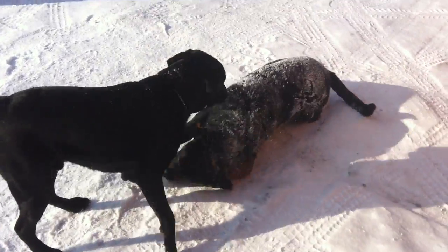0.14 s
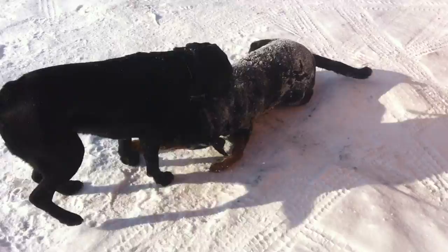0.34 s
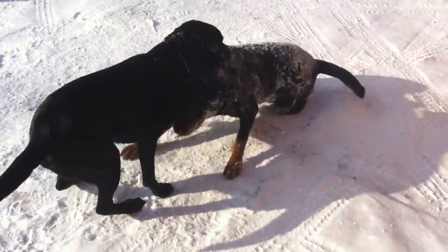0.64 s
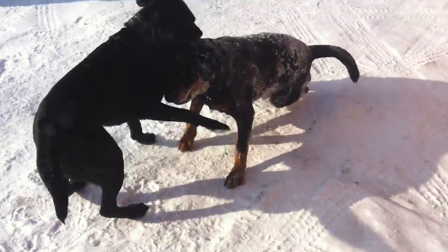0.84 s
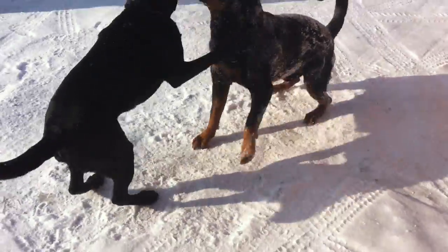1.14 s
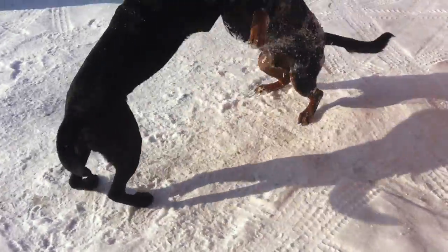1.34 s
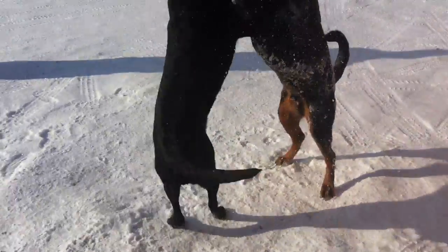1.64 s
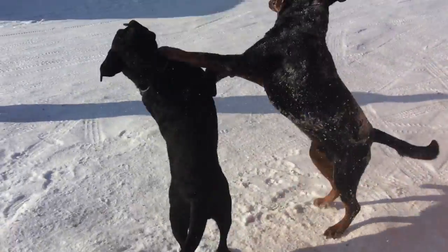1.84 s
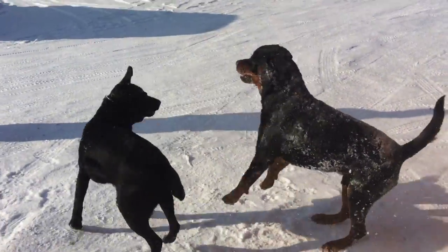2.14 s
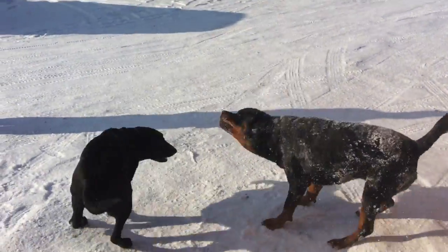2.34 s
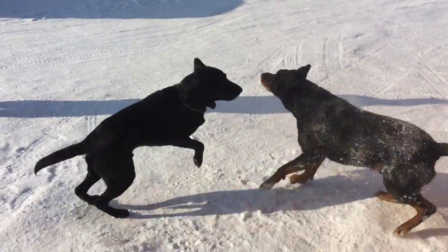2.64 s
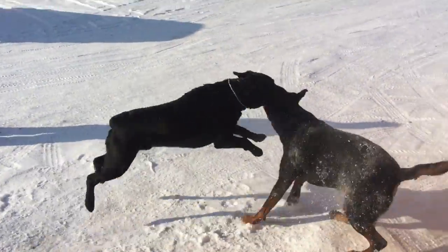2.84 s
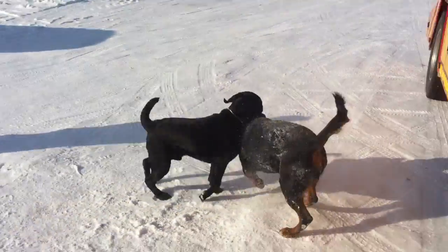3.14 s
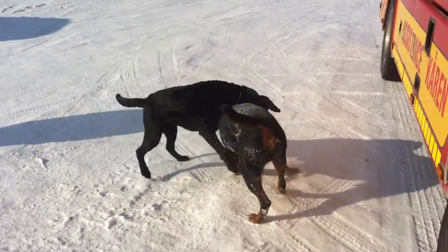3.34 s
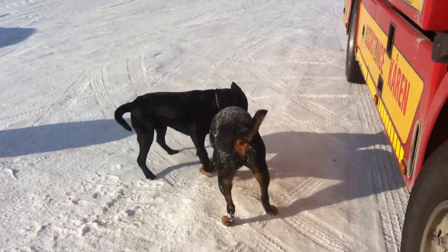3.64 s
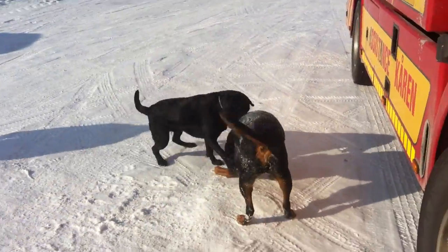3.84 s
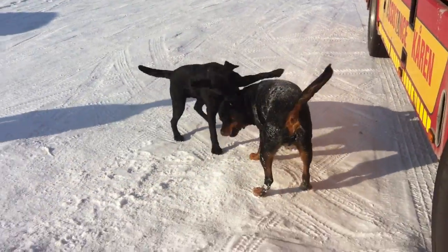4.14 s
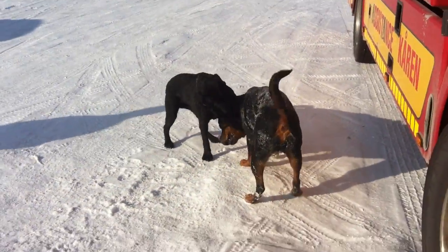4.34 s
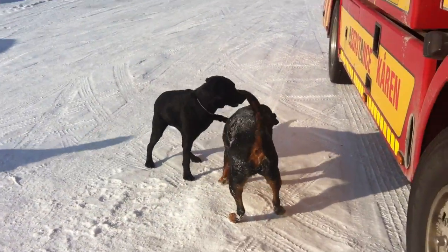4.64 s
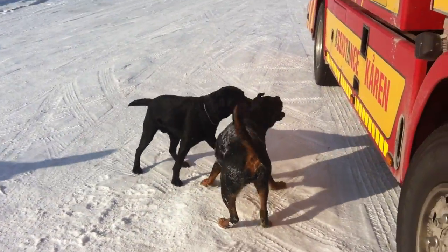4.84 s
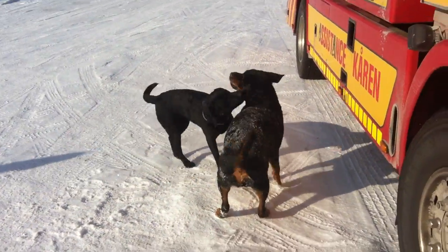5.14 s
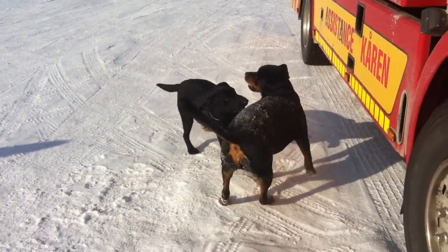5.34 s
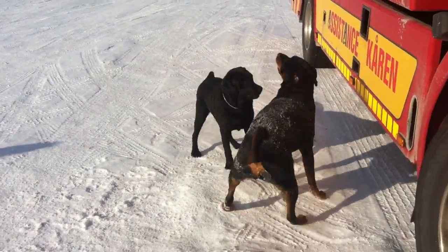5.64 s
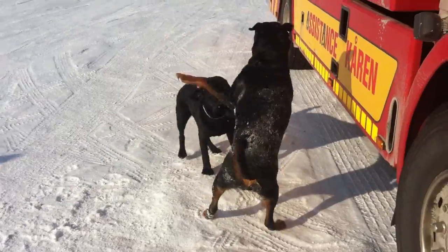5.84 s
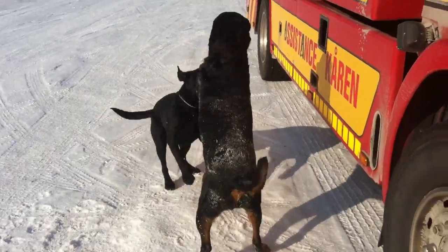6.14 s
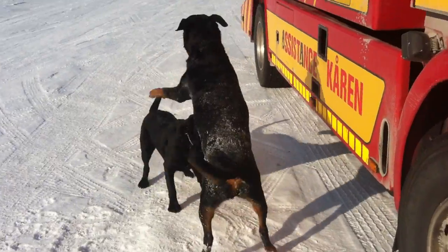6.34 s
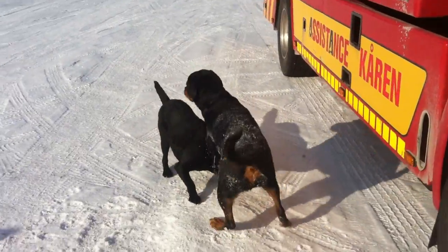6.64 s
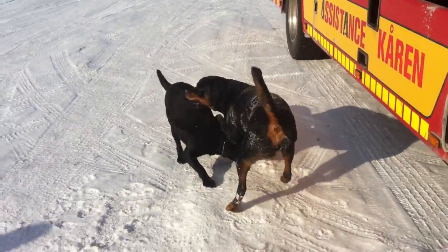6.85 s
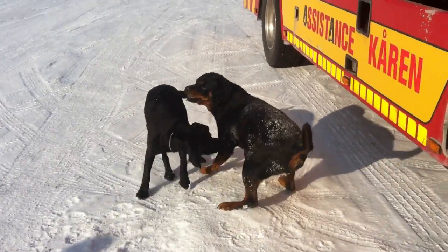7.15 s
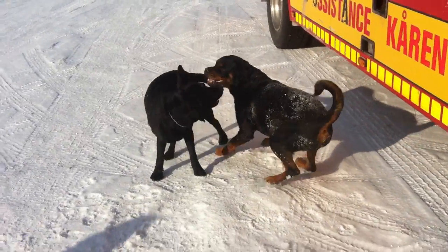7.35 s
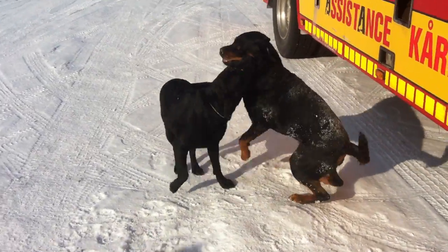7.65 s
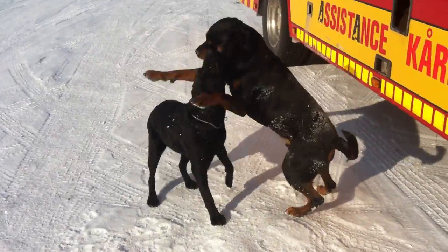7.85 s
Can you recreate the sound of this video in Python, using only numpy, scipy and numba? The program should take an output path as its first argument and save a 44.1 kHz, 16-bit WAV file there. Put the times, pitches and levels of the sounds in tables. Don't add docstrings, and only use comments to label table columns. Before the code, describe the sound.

Rough dog play outdoors: breathy huffs and grunts, snow scuffs, teeth clicks and dull thuds, then strong low wind rumble takes over.

```python
import sys
import numpy as np
from scipy import signal
from scipy.io import wavfile
from scipy.ndimage import uniform_filter1d
from numba import njit

SR = 44100
rng = np.random.default_rng(int(sys.argv[2]) if len(sys.argv) > 2 else 0)


def wav_record(signal):
    frames = np.transpose(np.atleast_2d(signal))
    bounded = np.clip(frames, -1, 1)
    quanta = np.round(bounded * 32767).astype(np.int16)
    wavfile.write(sys.argv[1], SR, quanta)


def makeup_ratio(level_db):
    decades = np.asarray(level_db, float) / 20
    return 10 ** decades


N = 352755
CONTROL = 64


def rms_one(x):
    return x / np.sqrt(np.mean(x ** 2) + 1e-20)


def in_time(rows):
    s, *columns = np.transpose(rows)
    return [np.interp(np.arange(N) / SR, s, c) for c in columns]


def drift(rate_hz):
    r = np.exp(-40 * np.pi * rate_hz / SR)
    white = rng.standard_normal(N // 20 + 4002)
    slow = signal.lfilter([1], [1, -2 * r, r * r], white)[4000:]
    return np.interp(np.arange(N) / 20, np.arange(len(slow)), rms_one(slow))


def band(x, low_hz, high_hz, order=2):
    edges_hz = [low_hz, min(high_hz, .45 * SR)]
    return signal.sosfilt(signal.butter(order, edges_hz, "band", fs=SR, output="sos"), x)


def high_pass(x, order, cut_hz):
    return signal.sosfilt(signal.butter(order, cut_hz, "high", fs=SR, output="sos"), x)


def coloured(source, spectrum, patchy_db, patches_per_s):
    hz, level_db = np.transpose(spectrum)
    edges_hz = 40 * 2 ** np.arange(0, 9, 1 / 3)
    out = 0
    for k, (low_hz, high_hz) in enumerate(zip(edges_hz, edges_hz[1:])):
        centre_db = np.interp(np.log(low_hz * high_hz) / 2, np.log(hz), level_db)
        gain = makeup_ratio(centre_db + patchy_db * drift(patches_per_s))
        out = out + gain * band(source[k % 2], low_hz, high_hz)
    return out


@njit
def resonance(x, hz, width_hz, sr):
    r = np.exp(-np.pi * width_hz / sr)
    out = np.zeros(len(x))
    for i in range(2, len(x)):
        drive = (1 - r * r) / 2 * (x[i] - x[i - 2])
        turn = 2 * r * np.cos(2 * np.pi * hz[i] / sr)
        out[i] = drive + turn * out[i - 1] - r * r * out[i - 2]
    return out


def evened(x, size=900):
    return np.std(x) * rms_one(x / np.sqrt(uniform_filter1d(x ** 2, size=size) + 1e-20))


def add(track, s, sound):
    at = max(round(s * SR), 0)
    track[at:at + len(sound)] += sound[:N - at]


def swells(s, peak_db, rise_s, fall_s, hold_s=0):
    late_s = np.arange(0, N + CONTROL, CONTROL) / SR - np.asarray(s)[:, None]
    past_hold_s = late_s - np.maximum(hold_s, 0)[..., None]
    rising = np.maximum(-late_s, 0) / np.maximum(rise_s, .004)[..., None]
    falling = np.maximum(past_hold_s, 0) / np.maximum(fall_s, .004)[..., None]
    return np.asarray(peak_db)[:, None] - 10 * (rising + falling)


def summed_db(levels_db, rest_db):
    steps = np.arange(levels_db.shape[1])
    power = np.interp(np.arange(N) / CONTROL, steps, np.sum(makeup_ratio(2 * levels_db), axis=0))
    return 10 * np.log10(power + makeup_ratio(2 * rest_db))


# full_s, effort_db, hold_s, throat_hz, mouth_hz
GRUNTS = [(0.047, -56, 0.007, 580, 1060), (0.126, -64, 0.12, 610, 1090), (0.357, -61, 0.1, 590, 1134),
          (1.386, -52, 0.0091, 473, 324), (1.412, -54.5, 0.012, 486, 700), (3.806, -52.5, 0.064, 1050, 786),
          (3.854, -57, 0.15, 740, 500), (4.19, -62.5, 0.068, 735, 425), (4.432, -56.5, 0.074, 933, 720),
          (4.627, -58, 0.063, 970, 705), (4.785, -62.5, 0.074, 784, 940), (5.037, -57.5, 0.095, 700, 990),
          (5.359, -57.5, 0.048, 776, 1175), (5.679, -57, 0.067, 1037, 840), (5.874, -61, 0.029, 1050, 820),
          (6.207, -63, 0.11, 1025, 564), (6.429, -59.5, 0.025, 566, 935), (6.89, -57, 0.12, 875, 1020),
          (7.075, -59, 0.084, 840, 1020), (7.509, -54, 0.097, 770, 1100), (7.686, -60, 0.099, 745, 1000),
          (7.79, -57.5, 0.11, 740, 964)]
# full_s, effort_db, hold_s, throat_hz, mouth_hz
SNORTS = [
    (2.186, -44.5, 0.017, 930, 348),
    (2.222, -36, 0.02, 935, 400),
    (2.26, -42.5, 0.031, 973, 356),
    (2.29, -41.5, 0.06, 872, 450),
]
# full_s, effort_db, hold_s, throat_hz, mouth_hz
HUFFS = [
    (0.71, -48, 0.067, 630, 970),
    (1.29, -54, 0.0065, 517, 756),
    (1.312, -53, 0.036, 490, 1040),
    (1.69, -58, 0.11, 960, 657),
    (2.051, -53.5, 0.062, 930, 740),
    (2.398, -48, 0.031, 632, 1110),
    (3.04, -51.5, 0.083, 660, 1226),
    (3.303, -51, 0.065, 840, 620),
    (6.502, -58.5, 0.075, 704, 410),
]
# full_s, effort_db, hold_s, throat_hz, mouth_hz
PANTS = [
    (1.86, -69.5, 0.22, 1050, 910),
    (2.64, -65.5, 0.059, 720, 1140),
    (2.76, -73, 0.0062, 710, 1080),
    (2.861, -63.5, 0.15, 576, 1000),
    (3.189, -64, 0.081, 1000, 507),
    (3.439, -64.5, 0.075, 1025, 690),
]
# mouth_db, jaw_hz, jaw_db, teeth_hz, teeth_db
VOICES = [
    (0.5, 1485, -27.5, 2300, -34),
    (-6.5, 1780, -14, 5060, -24),
    (-5.5, 2120, -13.5, 4800, -22.5),
    (0, 2300, 2.5, 3600, -9.5),
]
RUSH_DB = [
    -14,
    -26,
    -19.5,
    -9.5,
]


def breaths():
    rows = []
    for table, voice, rush_db in zip([GRUNTS, SNORTS, HUFFS, PANTS], VOICES, RUSH_DB):
        rows += [row + voice + (rush_db,) for row in table]
    s, peak_db, hold_s, *shape = np.transpose(rows)
    rise_s, fall_s = 0.0096, 0.016 + 0.29 * hold_s
    levels_db = swells(s, peak_db, rise_s, fall_s, hold_s)
    loudest = np.repeat(levels_db.argmax(axis=0), CONTROL)[:N]
    return summed_db(levels_db, rest_db=-79), [c[loudest] for c in shape]


def panting():
    effort_db, shape = breaths()
    throat_hz, mouth_hz, mouth_db, jaw_hz, jaw_db, teeth_hz, teeth_db, rush_db = shape
    air = rng.standard_normal((2, N)) * makeup_ratio(1.5 * drift(60))
    wander = 1 + .012 * drift(8)

    def steep(x, hz, width_hz):
        once = resonance(x, hz * wander, width_hz, SR)
        return resonance(once, hz * wander, 3 * width_hz, SR)

    throat = evened(steep(air[0], throat_hz, 80.))
    mouth = makeup_ratio(mouth_db) * evened(steep(air[1], mouth_hz, 90.))
    upper_jaw = makeup_ratio(-4) * steep(air[0], 1.17 * jaw_hz, 220.)
    jaw = makeup_ratio(jaw_db - 1) * (steep(air[1], jaw_hz, 140.) + upper_jaw)
    teeth = makeup_ratio(teeth_db) * steep(air[0], teeth_hz, 500.)
    upper_nose = makeup_ratio(-3) * steep(air[1], 4.2 * throat_hz, 200.)
    nose = makeup_ratio(jaw_db - 8) * (steep(air[1], 3.3 * throat_hz, 200.) + upper_nose)
    rush = makeup_ratio(rush_db) * band(air[0, ::-1], 450, 2800)
    return makeup_ratio(effort_db) * (throat + mouth + jaw + teeth + nose + rush) / np.std(throat + mouth)


# full_s, level_db, hold_s, start_hz, end_hz
WHISTLES = [(0.534, -66, .06, 1770, 1820), (0.542, -68, 0.058, 3380, 3520), (0.706, -50, .03, 924, 980),
            (1.34, -56.5, 0.017, 4650, 4630), (1.372, -61, .02, 4680, 4620), (1.38, -67, .05, 5400, 4960),
            (5.705, -65, 0.05, 2600, 2520), (1.39, -64, 0.063, 2520, 2560), (1.465, -61, 0.055, 1120, 1000),
            (1.694, -55.5, 0.038, 846, 920), (1.725, -56, 0.022, 720, 687), (1.986, -58, 0.034, 910, 870),
            (2.184, -47.5, .01, 920, 940), (2.262, -53, 0.066, 1150, 1080),
            (3.806, -59.5, 0.08, 2000, 2030), (2.209, -53, 0.052, 1730, 1800),
            (2.215, -55.5, 0.045, 4650, 4700), (2.265, -53, 0.041, 4900, 5000),
            (2.307, -59, .04, 4640, 4680), (2.235, -59, .05, 3000, 3180), (2.248, -58, .03, 4000, 3930),
            (2.256, -54, 0.023, 2140, 2200), (2.307, -51, 0.046, 2130, 2040),
            (2.329, -61, 0.036, 3060, 3050), (2.427, -58.5, 0.033, 2480, 2460),
            (2.434, -55, .015, 1540, 1500), (3.843, -53, 0.063, 1010, 1000), (3.95, -58, 0.018, 720, 720),
            (4.435, -59, 0.056, 950, 960), (4.43, -66, 0.053, 2800, 2520), (4.449, -65, 0.087, 2080, 2150),
            (4.45, -59, 0.025, 1610, 1660), (4.63, -56, 0.042, 920, 990), (4.665, -59, .03, 720, 700),
            (5.068, -68, 0.06, 2300, 2250), (6.503, -49.5, 0.067, 690, 666), (6.531, -52, 0.047, 360, 424),
            (6.51, -64, .06, 1570, 1700), (6.527, -65, 0.013, 1980, 1980), (7.527, -53, 0.028, 744, 776)]


def whistles():
    lead_s, edge_s = .05, 0.012
    out, t = np.zeros(N), np.arange(round(.2 * SR)) / SR - lead_s
    flutter_db = 4 * drift(35)
    airs = rng.standard_normal((len(WHISTLES), len(t)))
    for (s, level_db, hold_s, start_hz, end_hz), air in zip(WHISTLES, airs):
        hz = np.interp(t, [0, max(hold_s, .002)], [start_hz, end_hz])
        width_hz = 20 + 0.061 * start_hz
        once = resonance(air, hz, width_hz, SR)
        tone = evened(resonance(once, hz, 2 * width_hz, SR), size=1600)
        tone = tone * makeup_ratio(flutter_db[round(s * SR):][:len(t)])
        outside_s = np.maximum(-t, 0) + np.maximum(t - hold_s, 0)
        add(out, s - lead_s, makeup_ratio(level_db - 10 * outside_s / edge_s) * rms_one(tone))
    return out


# crest_s, level_db, fall_s (per 10 dB)
SCUFFS = [(0.03, -56.5, .12), (0.17, -58, 0.1), (0.47, -56, 0.02), (0.635, -58, 0.04), (0.77, -55.5, 0.09),
          (0.96, -58, 0.12), (1.122, -55, 0.03), (1.22, -57, 0.05), (1.31, -55, 0.05), (1.848, -55, -0.09),
          (2.039, -59.5, -0.56), (2.28, -54, 0.12), (2.67, -54, 0.19), (2.9, -56, 0.11), (3.24, -57, 0),
          (3.47, -60, 0.5), (3.66, -58.5, 0), (3.721, -57, -0.02), (3.87, -57, -0.08), (3.97, -57, 0.045),
          (4.5, -62.5, -0.93), (4.61, -63.5, -0.5), (4.92, -58, 0), (5.28, -68, -1), (5.78, -60.5, 0),
          (6.45, -65.5, 0.2), (6.6, -66, 0.07), (6.85, -58, 0.05), (7.05, -62, 0.55), (7.145, -54, 0.045),
          (7.45, -59, 0.02), (7.652, -56, 0.03)]
# time_s, level_db
SHUFFLE = [(0, -68), (4.0, -64), (7.2, -69.5), (7.5, -64), (7.83, -62), (7.94, -69.5), (8, -61.5)]


def scuffs_db():
    s, peak_db, fall_s = np.transpose(SCUFFS)
    fall_s = np.maximum(fall_s, .025)
    return summed_db(swells(s, peak_db, 1.45 * fall_s, fall_s, hold_s=0.0098), *in_time(SHUFFLE))


# pitch_hz, level_db (per Hz)
SCUFF_SPECTRUM = [(300, -15), (800, -1), (2400, 3.5), (4000, 1.5), (7600, 0.5), (9500, -1), (12000, 1),
                  (16000, -12)]


def snow():
    level_db = scuffs_db()
    chance, clumps = rng.random((2, N)), drift(30)
    born = chance < 6000 * makeup_ratio(3.0 * clumps) / SR
    sizes = makeup_ratio(1.2 * rng.exponential(1, (2, N)))
    grains = born * sizes * rng.choice([-1, 1], (2, N)) + 1e-18
    scuff = coloured(grains, SCUFF_SPECTRUM, patchy_db=1.6, patches_per_s=14)
    scuff = scuff / np.std(band(scuff, 4750, 10630))
    spray = rms_one(band(grains[0, ::-1], 13600, 19000)) * makeup_ratio(4.0 * drift(9))
    return makeup_ratio(level_db - 2.5 + 0.8 * clumps) * (scuff + makeup_ratio(-12.0) * spray)


def strikes(hits, contact, ring_t60, crack_t60, spread, crack_top_hz=7000):
    out, t = np.zeros(N), np.arange(round(.05 * SR)) / SR
    noises = rng.standard_normal((len(hits), 2, len(t)))
    for (s, peak_db, hz, crack_db), noise in zip(hits, noises):
        noise[:, 0] += contact * np.sign(noise[:, 0])
        ring = band(noise[0] * makeup_ratio(-60 * t / ring_t60), hz / spread, hz * spread)
        crack = band(noise[1] * makeup_ratio(-60 * t / crack_t60), 1500, crack_top_hz, order=1)
        ring = ring / np.abs(ring).max()
        crack = makeup_ratio(crack_db) * crack / np.abs(crack).max()
        add(out, s, makeup_ratio(peak_db) * (ring + crack))
    return out


# start_s, peak_db, ring_hz, crack_db (over peak)
CLICKS = [(0.054, -39.5, 600, -6), (0.347, -38, 1880, -2), (0.348, -40, 2820, -20), (0.407, -41, 939, -19),
          (0.443, -31, 890, -8), (0.4615, -33, 1200, -1), (0.366, -48, 2300, -20), (0.4871, -32, 885, -4),
          (0.898, -48, 1210, 1), (1.514, -42, 2470, -17), (1.667, -47, 2010, -7), (1.835, -38, 1710, 3),
          (2.677, -27, 830, -4), (2.678, -34.5, 2200, -7), (2.763, -36, 1050, -18),
          (2.771, -36.5, 615, -20), (2.864, -45, 700, -14), (2.867, -30, 960, -11.5), (3.008, -31, 2280, 1),
          (3.009, -30, 800, 2), (3.052, -31.5, 670, -2), (3.081, -39, 630, -7), (3.519, -45, 740, -11),
          (3.608, -39, 780, -13), (3.76, -36, 1020, -10), (4.195, -40.5, 785, -19), (5.932, -41, 860, -25),
          (6.51, -40, 700, -20), (6.828, -43, 790, -23), (7.148, -36.5, 860, -38), (7.374, -37, 550, -31),
          (7.748, -47, 600, -23), (7.768, -41, 850, -29), (7.834, -40, 1050, -25), (7.908, -32, 596, -30),
          (7.951, -41, 550, -30), (7.984, -43, 950, -20)]
# start_s, peak_db, ring_hz, crack_db (over peak)
TICKS = [(2.027, -42, 12000, -14), (2.7534, -42, 4070, -18), (3.672, -35.5, 4230, -8),
         (3.6834, -39, 5760, -4), (3.691, -32, 4400, 4), (3.694, -28, 11400, -3), (3.7035, -35, 11900, 3),
         (3.7605, -37.5, 9100, -6), (5.298, -52, 3350, 11.5), (6.595, -46, 2650, -19),
         (6.607, -46, 2680, -20), (6.6796, -47, 13000, 3), (7.0313, -43.5, 12000, -1),
         (7.074, -39, 9200, -24), (7.441, -43, 14300, -8), (7.5157, -53, 3560, 13),
         (7.5283, -39, 10200, -21.5), (2.033, -46, 13000, -20), (2.042, -48, 12000, -20),
         (2.05, -53, 13500, -20), (3.692, -37.5, 8100, -10), (3.862, -45, 11500, -10),
         (3.009, -36, 4600, -15)]


def clicks():
    snap_below_hz = 1400
    low = [row for row in CLICKS if row[2] < snap_below_hz]
    high = [row for row in CLICKS if row[2] >= snap_below_hz]
    snaps = strikes(low, contact=5., ring_t60=.01, crack_t60=.013, spread=1.7)
    rings = strikes(high, contact=4., ring_t60=.022, crack_t60=.014, spread=1.16)
    ticks = strikes(TICKS, contact=2.5, ring_t60=0.014, crack_t60=0.008, spread=1.15, crack_top_hz=16000)
    return snaps + rings + ticks


# crest_s, peak_db, swing_hz, length_cycles
THUDS = [(1.218, -37, 140, 2.1), (1.6, -42.5, 141, 1.5), (1.68, -40.5, 183, 2.3), (1.745, -34.5, 190, 0.95),
         (1.843, -42.5, 145, 4.8), (1.994, -29.5, 180, 2.2), (2.163, -43, 147, 1.3),
         (2.49, -39.5, 110, 0.83), (2.673, -27.5, 188, 1.44), (2.883, -32, 179, 1.15),
         (3.011, -38, 410, 3.1), (3.054, -31.5, 520, 0.57), (3.131, -29.5, 190, 2.7),
         (3.189, -23, 235, 1.07), (3.725, -39, 340, 1.4), (3.763, -32.5, 290, 1.03),
         (4.2, -41.5, 287, 0.88), (1.76, -40, 190, 1.7), (2.04, -40.5, 169, 1.2), (2.655, -38.5, 169, 0.92),
         (2.697, -36, 173, 1), (2.965, -44.5, 190, 1.8), (3.037, -38, 190, 1.7), (4.262, -41.5, 410, 1.3)]
# crest_s, peak_db, length_cycles
PUFFS = [(4.507, -30, 1.5), (4.541, -18.5, 1.26), (4.59, -23, 1.9), (4.606, -19, 1.34), (4.807, -26, 0.85),
         (4.844, -35.5, 2.8), (4.965, -37.5, 0.94), (5.006, -34, 1.1), (5.372, -32.5, 1.6),
         (5.41, -18.5, 0.87), (5.445, -25, 1.6), (5.49, -26, 1.4), (5.53, -28, 1.4), (5.652, -34, 1.5),
         (5.696, -35, 1.1), (5.913, -15, 1.2), (5.931, -12, 0.67), (5.968, -14, 0.78), (5.982, -13, 1.2),
         (6.101, -30.5, 0.94), (6.184, -31.5, 5.9), (6.25, -31.5, 1), (6.283, -29.5, 1.1),
         (6.395, -27.5, 1), (6.47, -23.5, 0.73), (6.51, -26.5, 1.5), (6.613, -22, 1.5), (6.652, -28.5, 1.4),
         (6.696, -33.5, 2.2), (6.801, -27.5, 0.92)]
# crest_s, peak_db, swing_hz, length_cycles
BUFFETS = [(6.829, -21, 280, 1.8), (6.86, -21.5, 190, 0.66), (6.878, -19, 179, 2.2), (6.899, -12, 205, 1.6),
           (6.947, -18, 276, 1.4), (6.99, -20.5, 176, 1.4), (7.008, -22.5, 209, 1.2),
           (7.053, -20.5, 175, 1.1), (7.066, -20, 233, 0.78), (7.116, -16, 190, 3.1),
           (7.16, -22, 172, 0.57), (7.236, -21.5, 177, 0.87), (7.276, -27, 175, 2.7),
           (7.359, -28.5, 167, 1.4), (7.384, -14.5, 150, 1.5), (7.414, -22, 164, 3.1),
           (7.465, -13.5, 204, 1.64), (7.504, -18.5, 166, 1.9), (7.553, -23.5, 164, 0.91),
           (7.594, -18, 198, 1.4), (7.673, -20.5, 177, 1.8), (7.688, -23.5, 179, 6),
           (7.715, -21.5, 256, 1.3), (7.751, -20, 187, 0.98), (7.784, -33, 145, 1.8),
           (7.797, -19.5, 195, 1.7), (7.903, -10.5, 230, 1), (7.925, -15, 190, 1.7),
           (7.952, -18.5, 255, 2.4)]
# crest_s, peak_db, swing_hz, length_cycles
EDDIES = [(4.36, -41.5, 138, 2.1), (4.576, -27, 230, 1.3), (4.786, -37, 150, 3.8), (4.822, -31, 210, 3.3),
          (4.868, -32.5, 190, 0.91), (5.859, -41, 165, 3.3), (5.903, -20.5, 190, 0.87),
          (5.924, -21.5, 180, 1.7), (5.96, -19.5, 210, 0.74), (5.971, -17, 414, 0.89),
          (5.992, -18, 190, 0.74), (6.01, -31, 220, 1.5), (6.029, -31, 148, 1.7), (6.045, -37, 159, 1.8),
          (6.602, -22, 151, 0.76), (6.632, -30, 170, 0.72), (6.737, -32, 160, 1.5),
          (6.757, -32.5, 160, 1.8), (6.913, -24, 200, 0.77), (6.929, -18, 230, 1.6),
          (6.963, -22.5, 270, 2.4), (7.086, -24.5, 260, 2.8), (7.099, -18.5, 205, 1.3),
          (7.18, -27.5, 200, 1.4), (7.374, -23, 330, 1), (7.434, -33, 164, 1), (7.473, -24, 394, 1.46),
          (7.582, -21, 254, 2.4), (7.613, -32, 190, 2), (7.738, -26, 169, 0.72), (7.845, -39, 238, 3.3),
          (7.875, -27, 140, 1.4), (7.889, -27, 219, 1.2), (7.912, -12, 257, 0.98), (7.966, -32, 170, 1.4),
          (5.95, -26, 165, 3), (4.541, -27, 320, 0.9), (4.605, -24, 360, 0.9), (7.384, -17, 316, 2.3),
          (7.952, -25.5, 420, 0.83), (5.135, -42, 302, 1.2)]


def swings():
    puffs = [(s, db, 190 + 3.5 * (db + 21), cycles) for s, db, cycles in PUFFS]
    return THUDS + puffs + BUFFETS + EDDIES


def thumps_and_buffets():
    out, rows = np.zeros(N), swings()
    phases = rng.uniform(0, 2 * np.pi, len(rows))
    for (s, peak_db, hz, length), phase in zip(rows, phases):
        cycles = np.arange(-5, 9, hz / SR)
        swell = np.exp(-(cycles / length / np.where(cycles < 0, .45, .65)) ** 2)
        angle = 2 * np.pi * (cycles - 0.034 * cycles * np.abs(cycles)) + phase
        sharpness = 0.14 * makeup_ratio(1.1 * (peak_db + 21.0))
        kink = sharpness * np.cos(1.963 * angle) * swell ** 3
        add(out, s - 5 / hz, makeup_ratio(peak_db) * swell * (np.cos(angle) + kink))
    return out


# time_s, level_db
LULL = [(0.0, -55), (0.94, -65), (1.2, -59), (1.3, -45), (1.45, -54), (1.55, -72), (2.26, -50.5),
        (2.45, -60), (3.47, -49.5), (3.86, -80), (4.16, -63), (4.28, -73), (4.37, -50), (4.46, -62.5),
        (5.85, -52.5), (6.1, -44.5), (6.75, -45), (8.0, -46)]


def wake_db():
    thuds = [(s, db - 2.5) for s, db, *_ in THUDS]
    s, peak_db = np.transpose(thuds + [row[:2] for row in PUFFS + BUFFETS])
    stirred_db = -32.5 + 0.89 * (peak_db + 21.0)
    return summed_db(swells(s, stirred_db, rise_s=0.022, fall_s=0.021, hold_s=0.011), *in_time(LULL))


def breeze():
    level_db = wake_db()
    white = rng.standard_normal((2, N)) * makeup_ratio(5.0 * np.tanh(drift(45)))
    eddies = rms_one(band(white[0], 108.7, 216.7))
    eddies = eddies + makeup_ratio(-10.5) * rms_one(band(white[1], 254, 398))
    eddies = eddies + makeup_ratio(-28) * rms_one(band(white[0], 446, 550))
    eddies = eddies + makeup_ratio(-10.0) * rms_one(band(white[1], 36, 97))
    height = np.sqrt(uniform_filter1d(eddies ** 2, size=400))
    return makeup_ratio(level_db - 4.0) * rms_one(eddies / (1 + 0.25 * height))


# time_s, level_db
DRONE = [
    (0, -58.5),
    (1.0, -65),
    (1.8, -62.5),
    (2.5, -76),
    (8, -87),
]


def drone():
    level_db, = in_time(DRONE)
    hz, width_hz = np.full(N, 230.0), 49
    once = resonance(rng.standard_normal(N), hz, width_hz, SR)
    return makeup_ratio(level_db) * rms_one(resonance(once, hz, width_hz, SR))


# pitch_hz, level_db (per Hz)
FLOOR = [(35, -24), (70, -10), (123, 0), (215, 2), (403, -5.5), (999, -5), (2100, -17.5), (7540, -56),
         (11700, -28), (15500, -21)]


def floor():
    white = rng.standard_normal((2, N))
    return makeup_ratio(-57.5) * rms_one(coloured(white, FLOOR, patchy_db=-2.0, patches_per_s=0.87))


def scene():
    dogs = panting() + whistles() + snow() + clicks()
    lag = round(0.012 * SR)
    echo = makeup_ratio(-22.5) * band(np.pad(dogs, (lag, 0))[:N], 200, 6000, order=1)
    port = high_pass(thumps_and_buffets() + breeze(), 2, 77)
    return (dogs + echo + port + drone() + floor())[None]


def band_limit(x):
    return signal.sosfilt(signal.butter(12, 15830, fs=SR, output="sos"), x)


def record(dry):
    x = .3 * np.tanh(dry / .3)
    x = high_pass(x, 3, 62)
    x = signal.sosfilt(signal.ellip(10, .3, 70, 15830, fs=SR, output="sos"), x)
    return band_limit(x)


dry = scene()
out = record(dry)
wav_record(out)
```